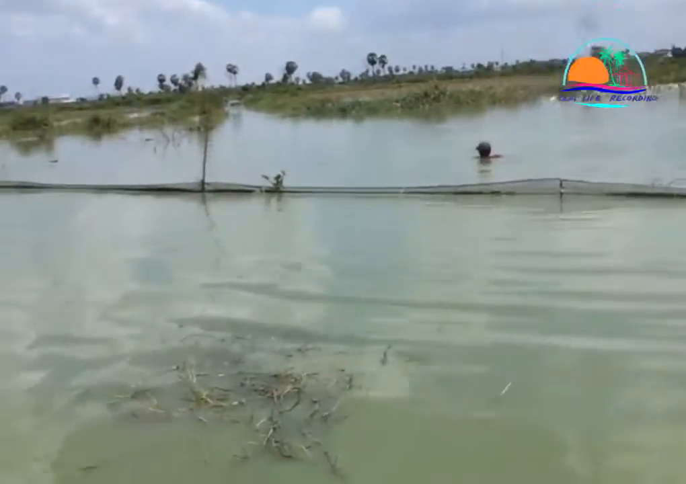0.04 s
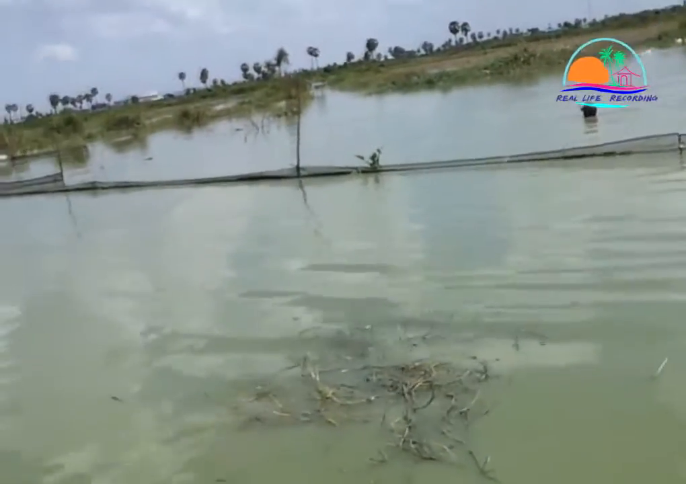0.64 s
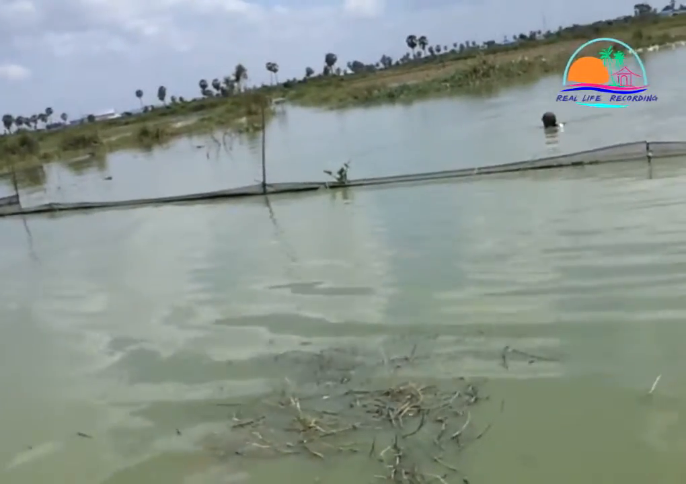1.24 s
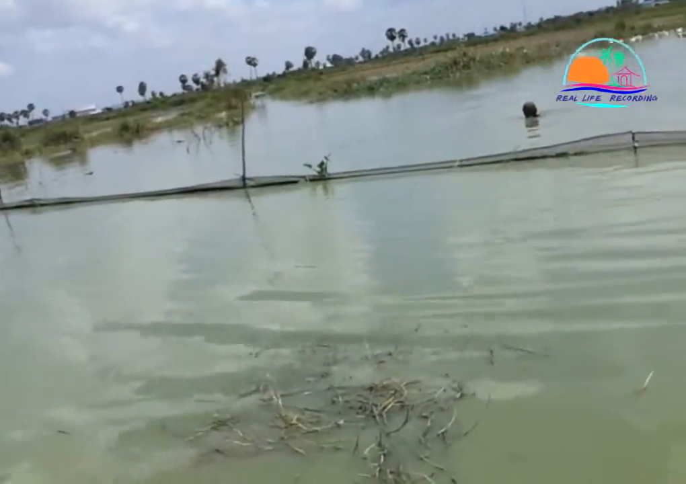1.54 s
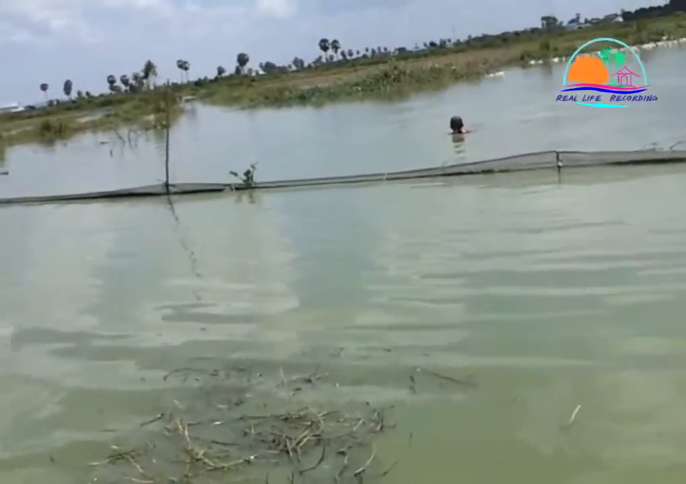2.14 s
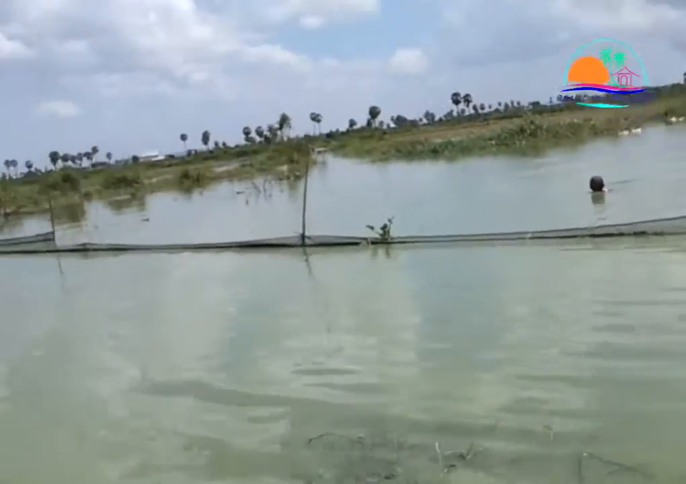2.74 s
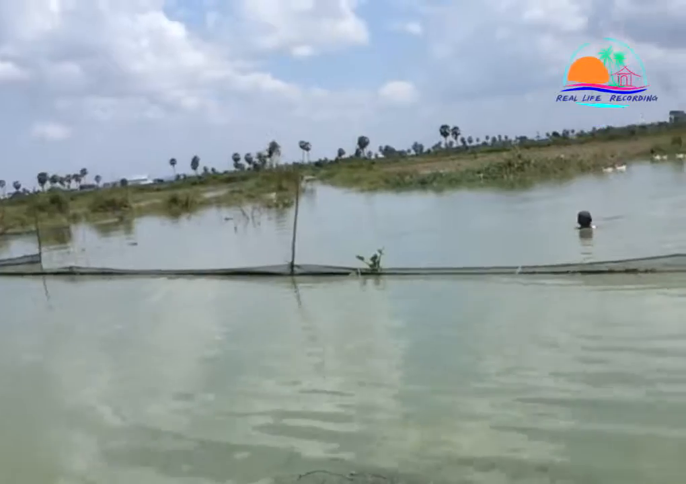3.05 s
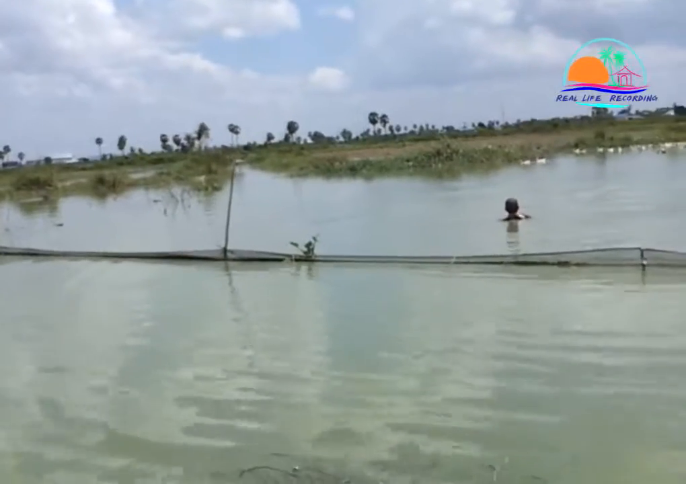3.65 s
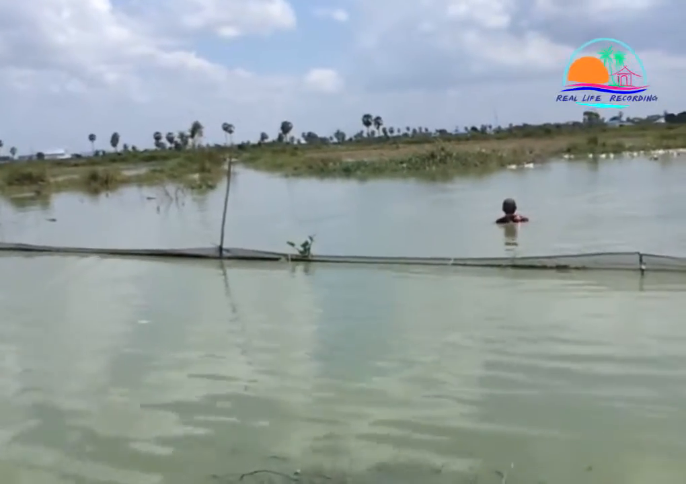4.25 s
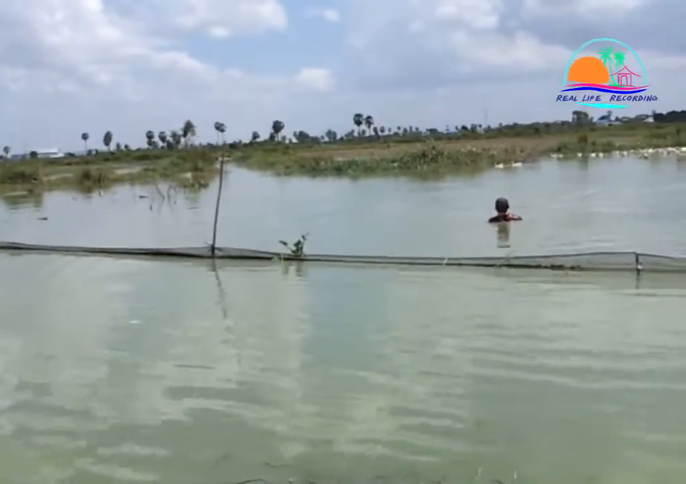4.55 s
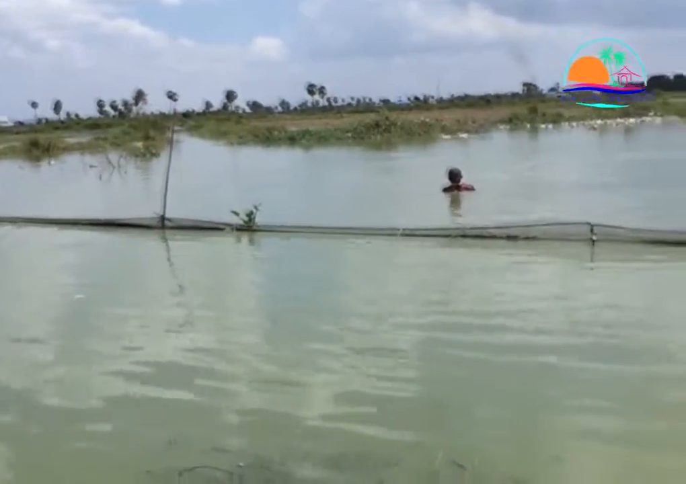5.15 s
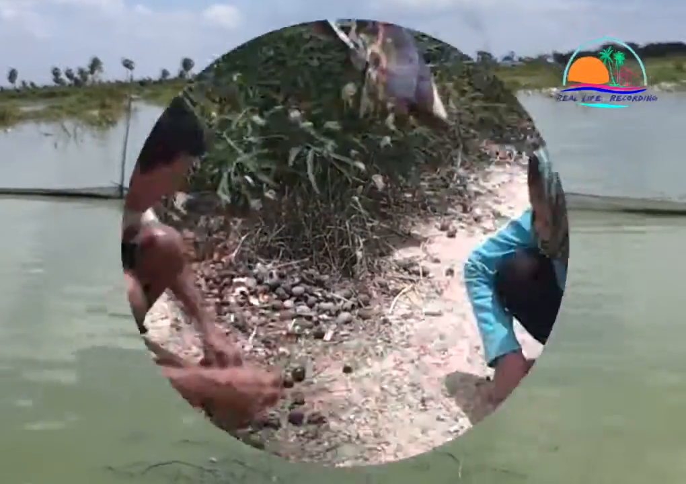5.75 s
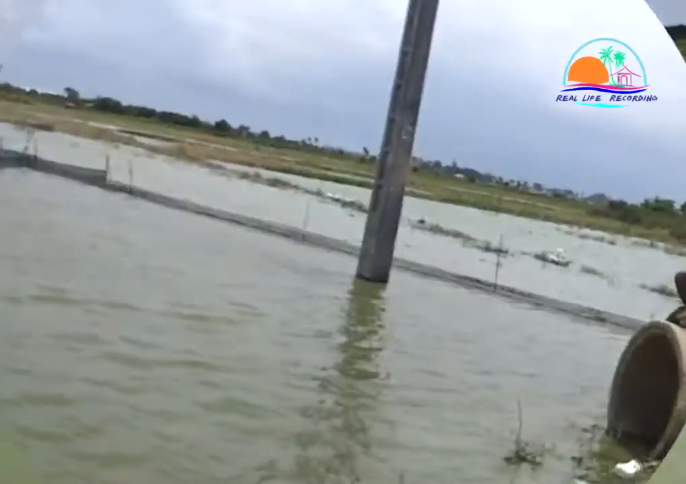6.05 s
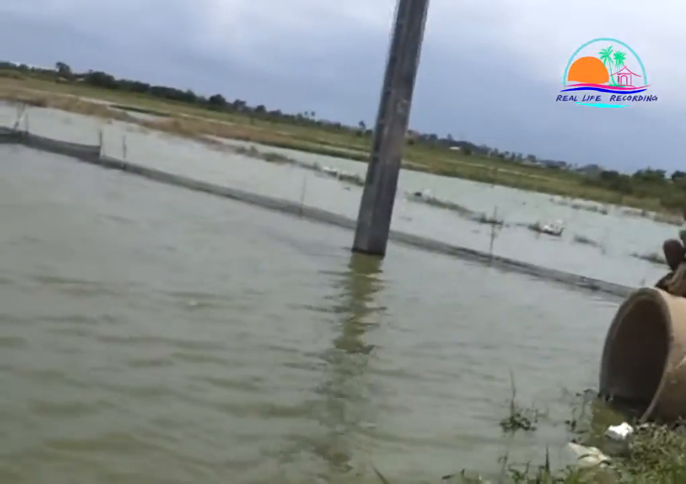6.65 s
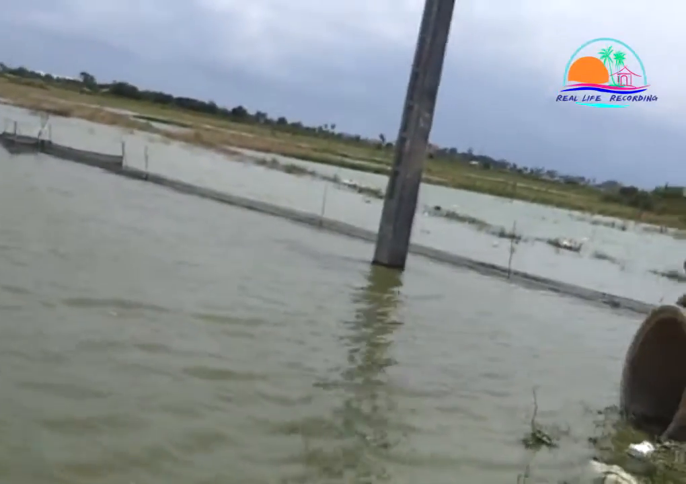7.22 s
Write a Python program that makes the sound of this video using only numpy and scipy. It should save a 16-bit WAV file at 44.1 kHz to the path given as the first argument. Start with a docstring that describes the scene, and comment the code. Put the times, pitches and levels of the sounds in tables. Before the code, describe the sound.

For the first six seconds, shallow water laps quietly at a grassy bank, close to a slightly dull microphone. Small wavelets slosh irregularly, bubbles plip, and water trickles back with a fine crackle, over a light, unsteady breeze and a faint hiss of open air. A cluster of brighter plips stands out around 1.3 seconds. Short rising glugs come near 1.8, 2.4 and 5.3 seconds, and the lapping and bubbling grow busier from about 3.7 to 5.4 seconds. At 5.9 seconds everything cuts to silence. At 6.6 seconds a much louder, windy shore snaps in: gusts pound the microphone with a deep, fluttering rumble, on the edge of distortion, while choppy waves splash in quick spurts and drops slap the surface. The strongest splash comes at about 7.1 seconds. The sound stops abruptly at about 7.5 seconds.

```python
"""Shallow floodwater laps at a grassy bank, close to the microphone: each wavelet sloshes and traps
small bubbles that plip, air pockets glug, and water trickles back through the grass, over a light breeze.
After a short silence comes a second place, a windy open shore: eddies buffet the microphone up to
clipping while choppy waves splash and throw drops that slap the surface."""
import sys
import numpy as np
from scipy import signal
from scipy.fft import rfft, irfft, next_fast_len
from scipy.io import wavfile
from scipy.ndimage import uniform_filter1d, minimum_filter1d, map_coordinates

SR = 44100
rng = np.random.default_rng(int(sys.argv[2]) if len(sys.argv) > 2 else 0)


def dump_mix(stems):
    """Bounce the given channels to the path in sys.argv[1] as a 16-bit WAV at rate SR."""
    frames = np.atleast_2d(stems).T  # one column per channel
    limited = np.clip(frames, -1, 1)  # hard clip at full scale
    pcm = np.round(limited * 32767).astype(np.int16)
    wavfile.write(sys.argv[1], SR, pcm)


N = 329912
TIME = np.arange(N) / SR


def amp(db):
    """Decibels to gain."""
    return 10 ** (np.asarray(db) / 20)


def unit(x):
    """Scaled to rms 1."""
    return x / np.sqrt(np.mean(x ** 2) + 1e-20)


def curve(rows):
    """Straight lines through (time, value) points, one value per sample."""
    return np.interp(TIME, *np.transpose(rows))


def wobble(rate):
    """A smooth random curve, rate knots a second."""
    return map_coordinates(rng.standard_normal(int(N * rate / SR) + 4), [TIME * rate])


def filtered(x, response):
    """x times a response of frequency."""
    size = next_fast_len(N + SR // 2)
    return irfft(rfft(x, size) * response(np.fft.rfftfreq(size, 1 / SR)), size)[:N]


def shaped(x, spectrum):
    """x through a gain given as (Hz, dB) points on a log axis."""
    points_hz, db = np.transpose(spectrum)
    return filtered(x, lambda hz: amp(np.interp(np.log(hz + 1), np.log(points_hz), db)))


def noise(spectrum):
    """Turbulent noise of rms 1."""
    return unit(shaped(rng.standard_normal(N), spectrum))


def ring(onsets, size, hz, life, rise):
    """Sum of bubbles: each swells, dies away and, given a rise, climbs in pitch as it nears the surface."""
    t = np.arange(int(9 * np.max(life) * SR)) / SR
    start_phase, climb = rng.random((len(onsets), 2)).T[:, :, None]
    age = t / np.maximum(life, 1e-4)[:, None]
    pitch = hz[:, None] * (1 + 2 * rise * climb * np.tanh((age - 1) / 2))
    phase = 2 * np.pi * (np.cumsum(pitch, axis=1) / SR + start_phase)
    tones = size[:, None] * age * np.exp(1 - age) * np.sin(phase)
    samples = np.round(onsets * SR).astype(int)[:, None] + np.arange(len(t))
    return np.bincount(samples.ravel(), tones.ravel(), N)[:N]


def froth(count, low_hz, high_hz, cycles, scatter_db):
    """A swarm of bubbles of random size and pitch, each living a few cycles; rms 1."""
    when, pitch, rarity = rng.random((count, 3)).T
    hz = low_hz * (high_hz / low_hz) ** pitch
    size = amp(-scatter_db * np.log(rarity + .04)) * np.sqrt(low_hz / hz)
    return unit(ring(when * N / SR, size, hz, cycles / hz, rise=0))


def splatter(onsets, db, spectrum, decay_s):
    """Short wet bursts of noise where the surface tears."""
    kicks = np.bincount(np.round(onsets * SR).astype(int), amp(db), N)[:N]
    envelope = signal.lfilter([1], [1, -np.exp(-1 / (decay_s * SR))], kicks)
    return envelope * noise(spectrum)


def wave_level(crests, drains, peaks_db, rest_db, run_up=.86):
    """Level in dB of waves that crest and drain over restless water; run_up is rise over draining time."""
    age = (TIME - crests[:, None]) / np.maximum(drains, 1e-3)[:, None]
    from_crest = np.maximum(age, -age / run_up)
    power = amp(peaks_db) ** 2 @ np.exp(-2 * np.minimum(from_crest ** 1.5, 20))
    return 10 * np.log10(power + amp(rest_db) ** 2)


# open air around the bank: (frequency [Hz], relative level [dB])
AIR_SPECTRUM = [(100, -18.5), (200, 0.5), (320, 4.5), (430, -10.5), (800, -10), (1500, -24), (2500, -36),
                (5000, -52.5), (6600, -54.5), (8000, -61.5)]
# its slow drift: (time [s], level [dB])
AIR_LEVEL = [(0, -55.5), (1.5, -58), (3.1, -52.5), (4.3, -56), (5.0, -53), (5.9, -54)]
def open_air():
    """Moving air rushes softly behind the water."""
    return amp(curve(AIR_LEVEL)) * noise(AIR_SPECTRUM)


# light breeze at the bank: (frequency [Hz], relative level [dB])
BREEZE_SPECTRUM = [(20, -44), (33, -13), (42, -5.5), (62, 4), (120, 1.5), (190, -2), (320, -11.5),
                   (800, -24), (1500, -38.5), (4000, -77)]
# its puffs and lulls: (time [s], level [dB])
BREEZE_LEVEL = [(0.0, -50), (0.48, -57), (0.575, -50), (0.63, -50), (0.69, -48.5), (0.75, -54), (0.97, -51),
                (1.27, -51), (1.325, -46.5), (1.42, -52), (3.45, -53), (3.68, -46), (3.92, -49.5),
                (4.18, -48.5), (4.55, -51.5), (4.7, -47.5), (5.02, -44), (5.3, -50), (5.75, -45.5),
                (5.9, -53.5)]
def breeze():
    """A light breeze rumbles unsteadily."""
    return amp(curve(BREEZE_LEVEL) + 1.2 * wobble(17)) * noise(BREEZE_SPECTRUM)


# faint high hiss heard at the bank: (frequency [Hz], relative level [dB])
HISS_SPECTRUM = [(2500, -25), (4200, -1), (6500, -6), (8000, -9)]
def faint_hiss():
    """A faint high hiss slowly swells and fades."""
    return amp(-74 + 2.5 * wobble(7)) * noise(HISS_SPECTRUM)


# fine spray, shared by trickle, plips and wavelets: (frequency [Hz], relative level [dB])
SPRAY_SPECTRUM = [(700, -5.5), (1450, -1.5), (1900, -5), (2500, 0.5), (3400, -7), (5000, -9), (6600, -19),
                  (8000, -38.5)]
# water running back through the grass: (fullest time [s], draining time [s], level [dB])
TRICKLES = [(.73, .08, -63), (.97, 0.14, -63), (2.56, 0.12, -63.5), (2.74, 0.15, -65), (3.92, 0.058, -61),
            (4.13, 0.23, -65.5), (4.72, 0.082, -77), (5.11, 0.046, -57)]
def trickle():
    """Draining water crackles in clumps of tiny bubbles and seeps between laps."""
    clumps_db = 1.8 * wobble(40)
    level_db = wave_level(*np.transpose(TRICKLES), rest_db=-84.5) + clumps_db
    bubbles = froth(count=4200, low_hz=1700, high_hz=4900, cycles=1.8, scatter_db=3.5)
    return amp(level_db) * unit(bubbles + .5 * noise(SPRAY_SPECTRUM))


# wind right on the microphone at the open shore: (frequency [Hz], relative level [dB])
BUFFET_SPECTRUM = [(20, -42.5), (36, -35), (50, -9), (80, -2.5), (150, 0), (250, -3.5), (520, -11),
                   (750, -17.5), (1100, -25), (2000, -57), (3300, -64.5), (5000, -57.5), (6500, -59.5),
                   (7500, -70)]
# its gusts: (time [s], level [dB])
GUSTS = [(6.63, -21), (6.698, -14), (6.768, -23), (6.84, -17), (7.208, -17.5), (7.238, -21), (7.426, -18.5),
         (7.448, -19), (7.48, -14.5)]
def wind_buffet():
    """Eddies pound the microphone with a deep, fluttering rumble."""
    return amp(curve(GUSTS) + .97 * wobble(35)) * noise(BUFFET_SPECTRUM)


# a drop landing off the shore: (frequency [Hz], relative level [dB])
SLAP_SPECTRUM = [(600, -8), (1500, 9), (3000, 2.5), (4500, -3.5), (6000, -18.5), (7000, -21.5), (9000, -38)]
# drops thrown by the chop: (time [s], level [dB])
DROPS = [(6.6653, -36), (6.686, -41), (6.703, -34), (6.7335, -38), (6.7703, -31), (6.78, -34), (6.867, -40),
         (6.8862, -26), (7.085, -25), (7.097, -30), (7.110, -34), (7.1734, -34), (7.2733, -37),
         (7.277, -33), (7.3751, -44), (7.407, -36)]
def drop_slaps():
    """Each falling drop slaps the surface in a brief burst."""
    return splatter(*np.transpose(DROPS), SLAP_SPECTRUM, decay_s=.0012)


# body and spray of a splash on the shore, each: (frequency [Hz], relative level [dB])
SPLASH_SPECTRUM = [(300, -13.5), (700, 5.5), (1500, 7), (2100, -0.5), (3000, -10), (4500, -28), (7000, -52)]
SHORE_SPRAY_SPECTRUM = [(1200, -22.5), (2200, 3), (3300, -5), (4400, -5), (5500, -19), (6600, -24),
                        (8000, -40)]
# waves on the shore: (crest time [s], draining time [s], splash level [dB], spray level [dB])
BREAKERS = [(6.664, 0.0066, -29, -50.5), (6.683, .024, -28.5, -45), (6.764, 0.0065, -32, -44),
            (6.84, 0.15, -43, -52.5), (7.088, 0.028, -24.5, -38.5), (7.108, 0.0073, -21.5, -35.5),
            (7.131, 0.015, -20.5, -45.5), (7.377, 0.0044, -24, -41), (7.409, .007, -33, -43),
            (7.445, .06, -40.5, -49)]
def choppy_waves():
    """Waves break quickly, in spurts of churned bubbles and brighter spray over a low wash."""
    crests, drains, splash_peaks_db, spray_peaks_db = np.transpose(BREAKERS)
    splash_db = wave_level(crests, drains, splash_peaks_db, rest_db=-42.5, run_up=.54)
    spray_db = wave_level(crests, drains, spray_peaks_db, rest_db=-62.5, run_up=.54)
    churn = froth(count=7000, low_hz=700, high_hz=3000, cycles=2, scatter_db=2)
    mist = froth(count=9000, low_hz=2000, high_hz=6500, cycles=1, scatter_db=3)
    splash = unit(unit(shaped(churn, SPLASH_SPECTRUM)) + noise(SPLASH_SPECTRUM))
    spray = unit(unit(shaped(mist, SHORE_SPRAY_SPECTRUM)) + noise(SHORE_SPRAY_SPECTRUM))
    spurts = amp(1.6 * wobble(150))
    return spurts * (amp(splash_db) * splash + amp(spray_db) * spray)


# air pockets at the bank: (time [s], length [s], level [dB], first pitch [Hz], last pitch [Hz])
AIR_POCKETS = [(1.834, 0.035, -49, 743, 1000), (2.391, 0.036, -41, 366, 650), (3.695, 0.019, -55, 425, 650),
               (5.297, 0.053, -41.5, 400, 1080)]
def glugs():
    """A pocket of air shrinks as the water closes over it, so its unsteady note rises."""
    notes = np.zeros(N)
    flutter = .05 * wobble(250)
    throb_db = 2.5 * wobble(200)
    for onset, length, db, first_hz, last_hz in AIR_POCKETS:
        progress = np.linspace(0, 1, round(length * SR))
        span = slice(round(onset * SR), round(onset * SR) + len(progress))
        pitch = first_hz * (last_hz / first_hz) ** progress * (1 + flutter[span])
        swell = np.sqrt(np.abs(np.sin(np.pi * progress)))
        notes[span] += amp(db) * swell * np.sin(2 * np.pi * np.cumsum(pitch) / SR)
    return notes * amp(throb_db)


# larger bubbles near the microphone, at both places: (time [s], level [dB], pitch [Hz], life [cycles])
CLOSE_BUBBLES = [(.905, -51, 2200, 2), (.9395, -49.5, 4200, 3.2), (0.9882, -54, 2290, 2.9),
                 (1.099, -50, 3100, 1.5), (1.121, -51, 3230, 1.9), (1.2017, -44.5, 1410, 0.84),
                 (1.2815, -58, 2010, 3.5), (1.288, -38, 2440, 2.4), (1.2912, -40, 2940, 3.1),
                 (1.2953, -29.5, 2730, 2.6), (1.3005, -45, 1910, 0.83), (1.3025, -36, 3300, 0.92),
                 (1.303, -48, 4140, 5.4), (1.315, -46, 1530, 1), (1.354, -42, 1950, 0.76),
                 (1.3705, -42, 1580, 0.72), (1.372, -38, 3180, 1.7), (1.392, -37, 3640, 0.67),
                 (1.3935, -48, 4040, 3), (1.3965, -28, 2720, 0.98), (1.3983, -52, 4100, 4.4),
                 (1.422, -49, 3650, 2.6), (2.2862, -50, 1620, 2.5), (2.296, -50, 2440, 3),
                 (2.3556, -44.5, 2570, 2.3), (2.357, -50.5, 5400, 4.3), (2.3665, -37.5, 520, 0.92),
                 (2.375, -50, 3370, 4.5), (2.3965, -50, 3570, 2.8), (2.4005, -50.5, 5150, 2.8),
                 (2.403, -42.5, 610, 1), (2.4219, -51, 2100, 3), (2.455, -35, 1354, 2.5),
                 (2.4553, -47, 2450, 1.6), (2.494, -51, 2210, 2.3), (2.5327, -52, 2140, 2),
                 (2.568, -54, 4320, 4), (2.656, -53, 2550, 2.4), (2.782, -52, 2600, 2.2),
                 (2.599, -52, 1700, 2.1), (2.691, -49, 2640, 3.2), (2.738, -57, 2600, 3),
                 (2.805, -55, 4170, 3.5), (2.8164, -45.5, 780, 0.9), (2.8205, -51, 2350, 3.5),
                 (3.062, -50, 5200, 3.5), (3.703, -40.5, 700, 1.1), (3.7628, -40, 1200, 1.1),
                 (3.797, -40, 950, 1.1), (3.802, -37, 860, 2.15), (3.811, -44.5, 1510, 2.1),
                 (3.846, -42.5, 2560, 2.9), (3.915, -48, 3400, 1.5), (3.9246, -45, 2190, 1.2),
                 (3.995, -44.5, 4780, 3.1), (3.998, -31.5, 2470, 0.54), (4.0, -43.5, 2230, 4),
                 (4.014, -40.5, 910, 1.8), (4.0405, -46, 2610, 1.5), (4.084, -52, 720, 1.3),
                 (4.1016, -36, 2010, 0.78), (4.1426, -48, 1560, 2.6), (4.172, -50.5, 2800, 2.5),
                 (4.218, -45.5, 1290, 2.9), (4.2877, -43, 683, 3), (4.29, -46, 1360, 3),
                 (4.2886, -28.5, 1640, 0.62), (4.289, -45, 2500, 1.6), (4.321, -51.5, 3600, 1.9),
                 (4.4425, -43, 1100, 0.89), (4.7823, -50, 1260, 0.64), (4.8583, -34.5, 890, 2.1),
                 (4.879, -40, 2420, 1.1), (4.8932, -42, 2270, 3.9), (4.984, -38, 2900, 0.62),
                 (5.029, -43.5, 2010, 2.7), (5.0732, -38.5, 4140, 0.66), (5.0917, -46, 2940, 2.4),
                 (5.1256, -44, 2210, 0.71), (5.1415, -29.5, 2110, 1.44), (5.2145, -42.5, 730, 2.3),
                 (5.2149, -44.5, 1890, 1), (5.2713, -34, 654, 1.06), (5.293, -33, 865, 1.9),
                 (5.2942, -48.5, 5600, 1.8), (5.2943, -48, 2610, 1.4), (5.3305, -52, 2320, 2.3),
                 (5.354, -47, 4250, 4), (5.3578, -32.5, 2220, 1.13), (5.3623, -33, 4050, 3.8),
                 (5.5036, -40.5, 4190, 1.2), (5.72, -54, 2270, 2.7), (6.678, -31, 2010, 5.2),
                 (6.7017, -29, 1950, 2.6), (6.7697, -30, 1640, 0.75), (6.779, -42, 1720, 0.85),
                 (7.172, -20.5, 1520, 1.24), (7.174, -39, 3900, 6.9), (7.271, -35.5, 2150, 2.4)]
def plips():
    """Single bubbles pinch off close by; strong ones climb in pitch, small bright ones tick more."""
    onsets, db, hz, cycles = np.transpose(CLOSE_BUBBLES)
    life = cycles / hz
    climb = np.interp(db, [-48, -34], [.015, .07])
    pops = ring(onsets, amp(db), hz, life, rise=climb[:, None])
    after_ring = ring(onsets + life, amp(db - 9.5), hz * (1 + 2 * climb), life * 1.3, rise=0)
    tick_db = db - 13 + 4 * np.log2(hz / 2000) - .1 * (db + 40)
    ticks = splatter(onsets + life / 2, tick_db, SPRAY_SPECTRUM, decay_s=.002)
    return pops + after_ring + ticks


# shallow water sloshing against the grass: (frequency [Hz], relative level [dB])
SLOSH_SPECTRUM = [(150, -27), (330, 5.5), (500, 0.5), (950, 5), (1300, -3), (1800, -23.5), (3000, -22),
                  (6000, -59)]
# laps at the bank, close by: (crest time [s], draining time [s], slosh level [dB], spray level [dB])
WAVELETS = [(.57, 0.077, -51.5, -68), (.75, 0.095, -53.5, -66), (.97, 0.18, -58, -65.5),
            (1.19, 0.065, -51, -78), (1.31, 0.051, -57, -54), (1.701, 0.062, -50, -83),
            (1.845, 0.035, -52, -62.5), (2.08, 0.57, -58, -84), (2.4, 0.34, -55, -65.5),
            (2.69, 0.27, -55, -70), (3.53, 0.54, -57.5, -87.5), (3.807, 0.031, -45.5, -81),
            (4.08, 0.35, -53.5, -65.5), (4.42, 0.19, -56.5, -86.5), (4.73, 0.2, -57, -62.5),
            (4.888, 0.043, -47.5, -78), (5.11, 0.093, -55, -60.5), (5.301, 0.11, -53, -58.5)]
def lapping_wavelets():
    """Wavelets slosh with large bubbles and fizz with small ones; ripples carry on between them."""
    crests, drains, slosh_peaks_db, spray_peaks_db = np.transpose(WAVELETS)
    unrest_db = wobble(18)
    slosh_db = wave_level(crests, drains, slosh_peaks_db, rest_db=-60) + unrest_db
    spray_db = wave_level(crests, drains, spray_peaks_db, rest_db=-65.5) + unrest_db
    gurgle = froth(count=1200, low_hz=449, high_hz=1404, cycles=2.06, scatter_db=3.5)
    slosh = amp(slosh_db) * (amp(-1.5) * noise(SLOSH_SPECTRUM) + amp(-4.5) * gurgle)
    # a wavelet that runs higher up the bank also swishes more brightly
    surge = np.clip((slosh_db + 56) / 6, 0, 1)
    swish_bubbles = froth(count=6000, low_hz=1120, high_hz=2800, cycles=2, scatter_db=2.5)
    swish = amp(slosh_db - 7.5) * surge * swish_bubbles
    # the livelier the wavelet, the more of its spray is separate bubbles and the less is soft hiss
    breaking = np.clip((spray_db + 68) / 10, .15, .85)
    fizz = np.sqrt(breaking) * froth(count=3600, low_hz=1400, high_hz=5800, cycles=2.6, scatter_db=4.2)
    hiss = np.sqrt(1 - breaking) * noise(SPRAY_SPECTRUM)
    shimmer_db = 1.8 * wobble(45)
    spray = amp(spray_db + shimmer_db) * (hiss + fizz)
    # now and then a larger bubble stands out of the wash
    stray_bubbles = froth(count=400, low_hz=1010, high_hz=4260, cycles=1.3, scatter_db=7)
    patter = amp(spray_db - 11.5) * breaking * stray_bubbles
    return slosh + swish + spray + patter


def scene():
    """First the calm bank, then the windy shore; bubbles plip at both."""
    calm_bank = open_air() + breeze() + faint_hiss() + trickle() + glugs() + lapping_wavelets()
    windy_shore = wind_buffet() + drop_slaps() + choppy_waves()
    return (np.where(TIME > 6, windy_shore, calm_bank) + plips())[None]


def limiter(x, ceiling, hold_s):
    """A fast limiter ducks each peak that would pass the ceiling."""
    window = round(hold_s * SR)
    gain = ceiling / np.maximum(np.abs(x), ceiling)
    return x * uniform_filter1d(minimum_filter1d(gain, window), window)


# the microphone's treble roll-off: (frequency [Hz], gain [dB])
MICROPHONE_RESPONSE = [(5600, -1), (6400, -7), (7000, -8.5), (7500, -15), (8500, -37)]
# open at the bank, silent, then abruptly open at the shore: (time [s], gain [linear])
GATE = [(0, 1), (5.906, 1), (5.911, 0), (6.6125, 0), (6.61253, 1), (7.476, 1), (7.481, 0)]
def record(dry):
    """A dull microphone, limited and just clipping in gusts; after the silence the shore snaps on."""
    dull = shaped(dry[0], MICROPHONE_RESPONSE)
    limited = limiter(dull, ceiling=.293, hold_s=.004)
    snap = amp(-22) * np.exp(-np.abs(TIME - 6.6125) / .0005)
    clipped = np.clip(limited + snap, -.29, .29)
    return filtered(clipped * curve(GATE), lambda hz: hz < 15100)[None]


dry = scene()
out = record(dry)
dump_mix(out)
```